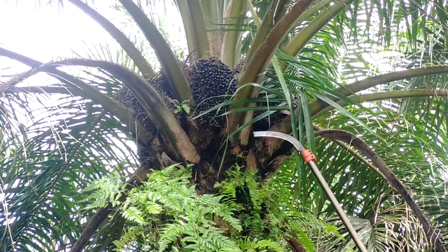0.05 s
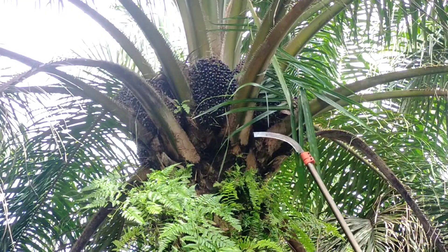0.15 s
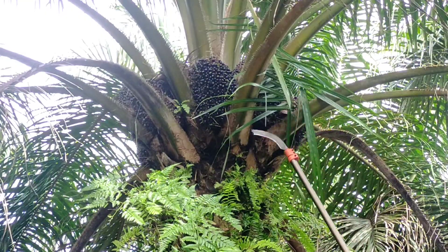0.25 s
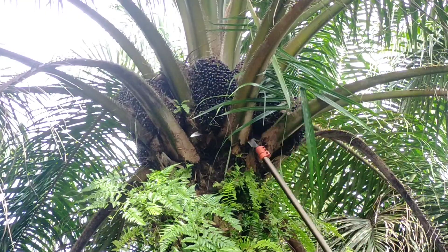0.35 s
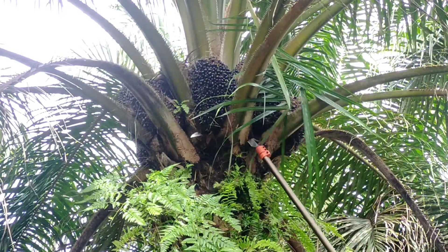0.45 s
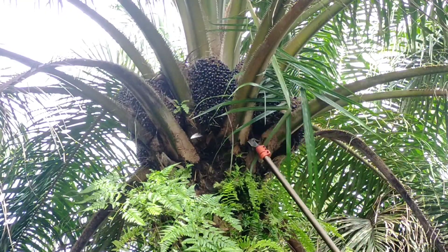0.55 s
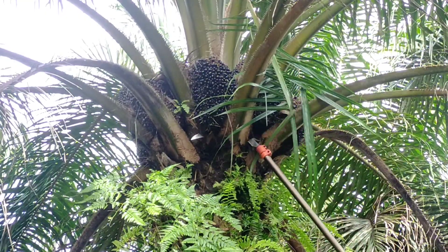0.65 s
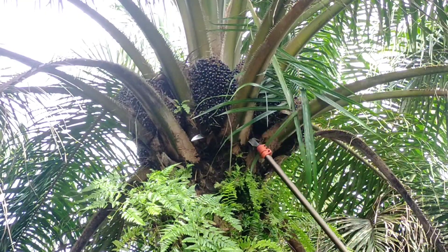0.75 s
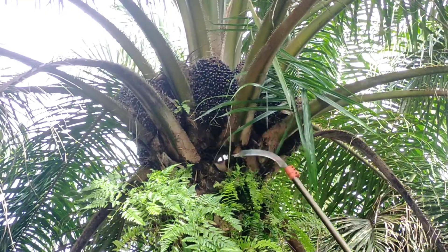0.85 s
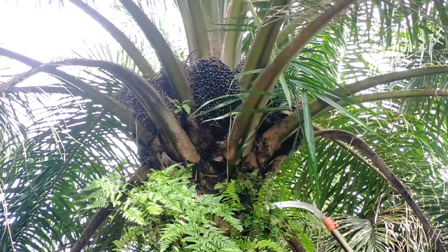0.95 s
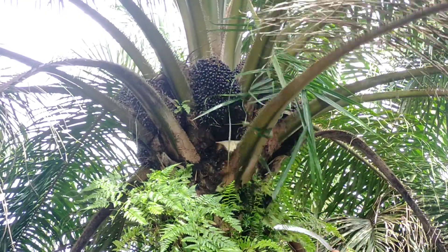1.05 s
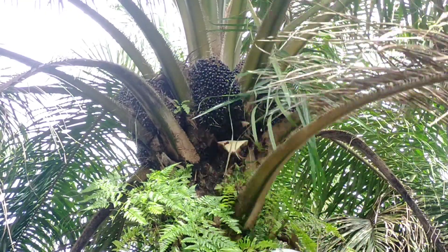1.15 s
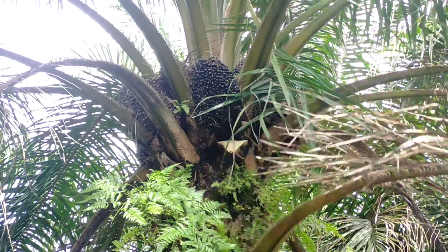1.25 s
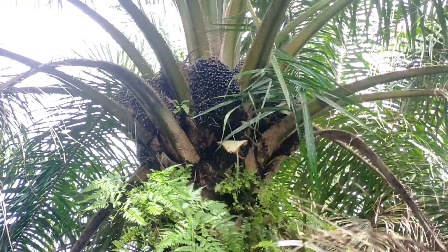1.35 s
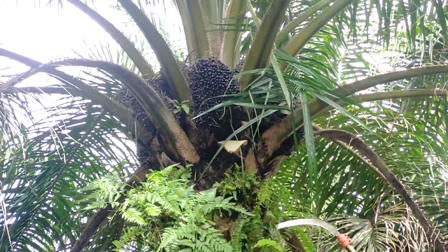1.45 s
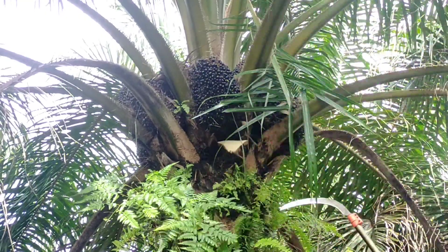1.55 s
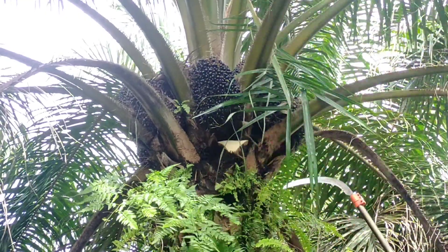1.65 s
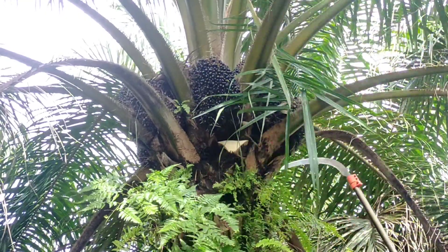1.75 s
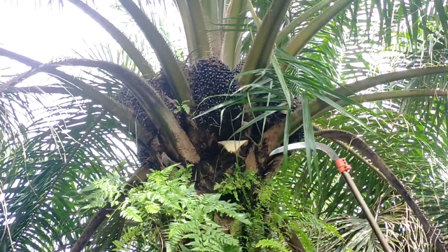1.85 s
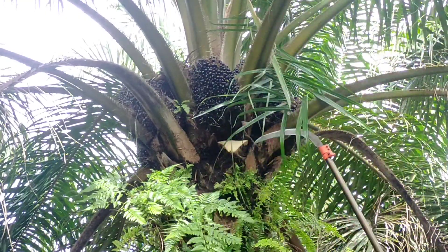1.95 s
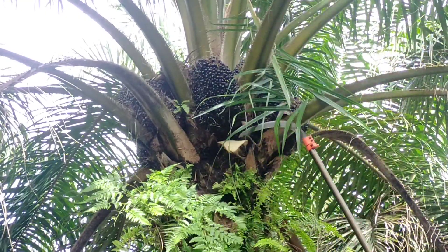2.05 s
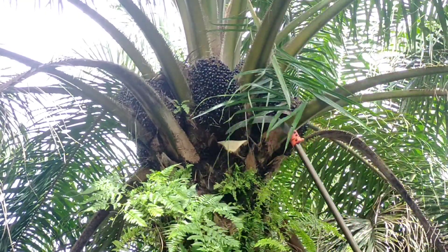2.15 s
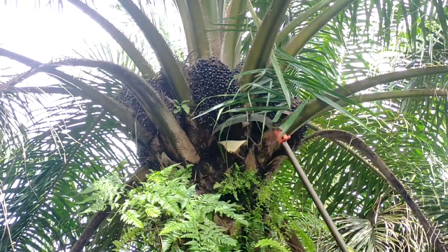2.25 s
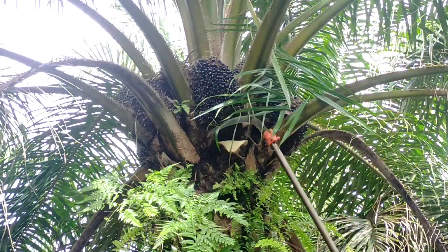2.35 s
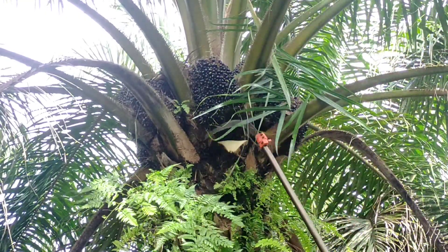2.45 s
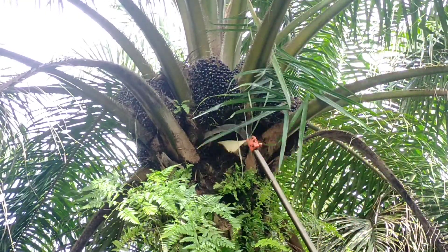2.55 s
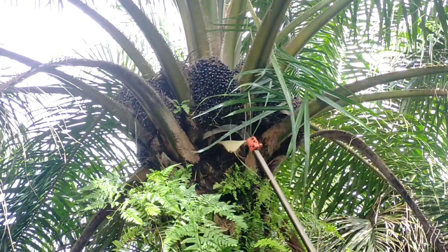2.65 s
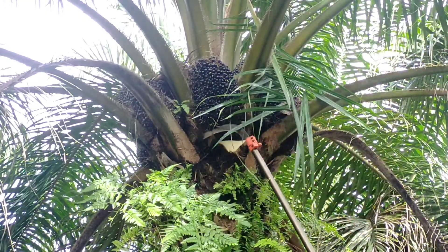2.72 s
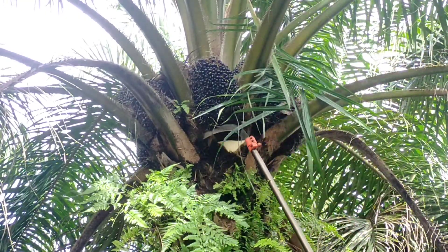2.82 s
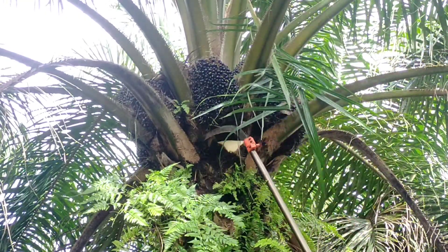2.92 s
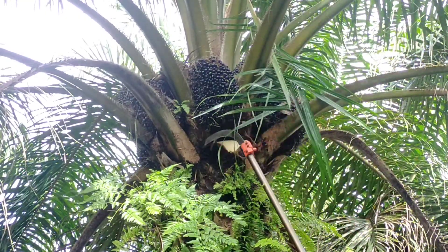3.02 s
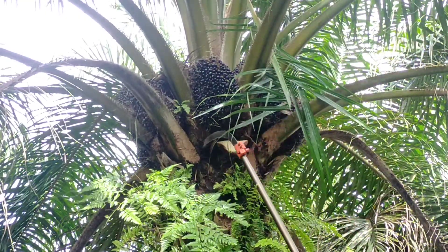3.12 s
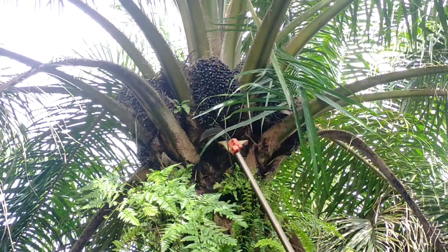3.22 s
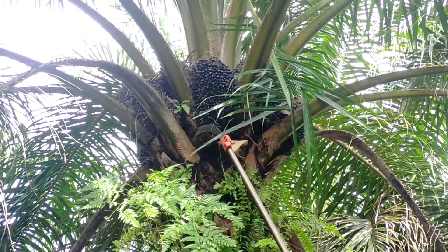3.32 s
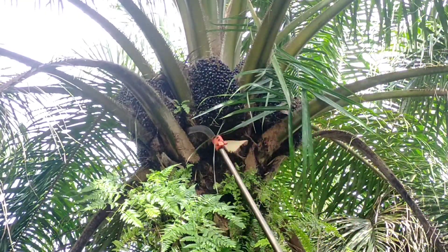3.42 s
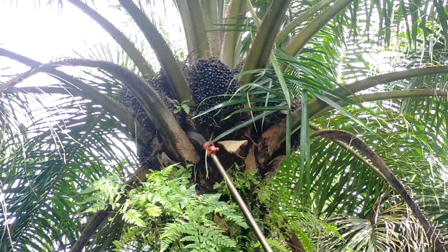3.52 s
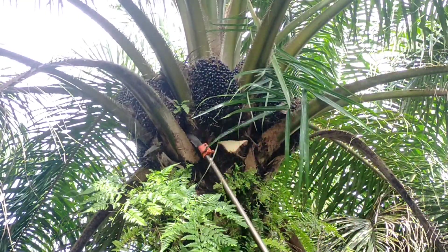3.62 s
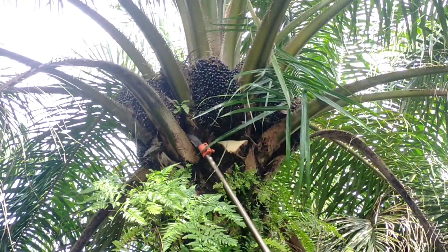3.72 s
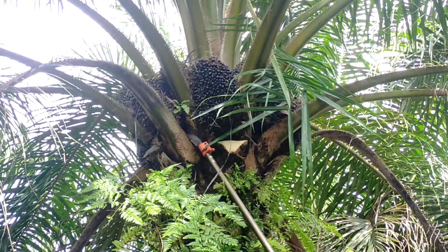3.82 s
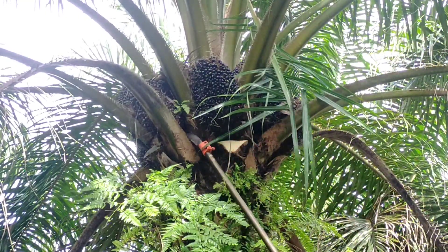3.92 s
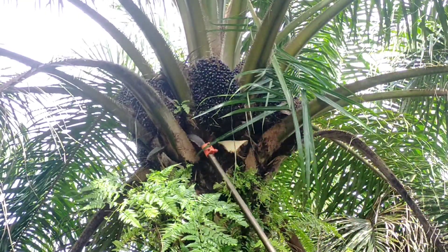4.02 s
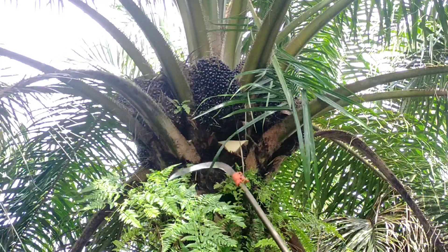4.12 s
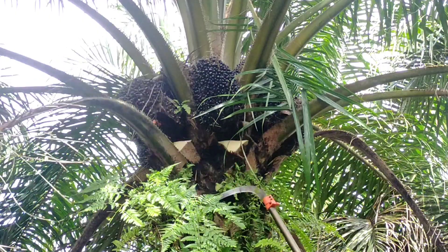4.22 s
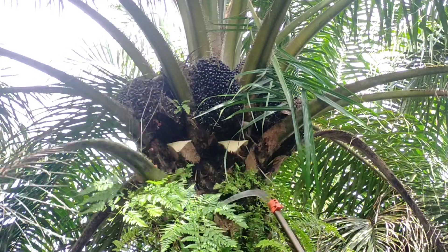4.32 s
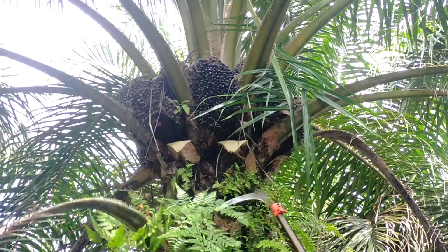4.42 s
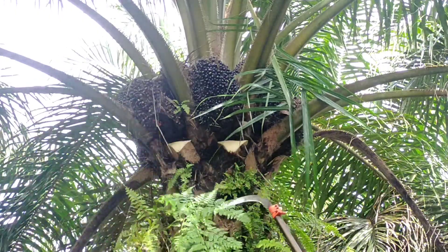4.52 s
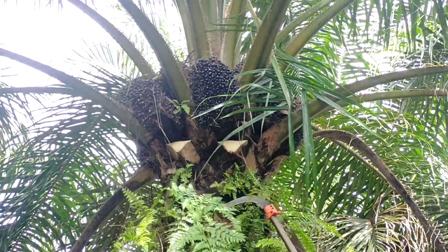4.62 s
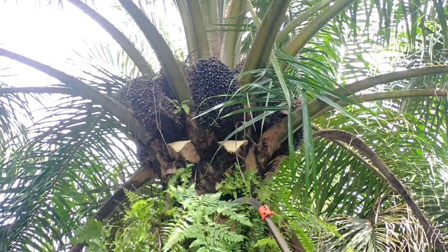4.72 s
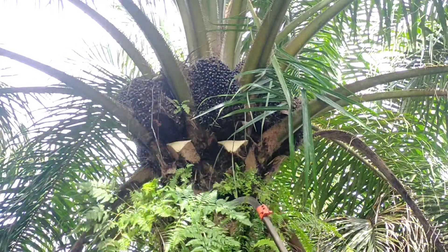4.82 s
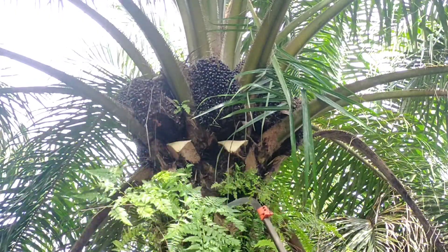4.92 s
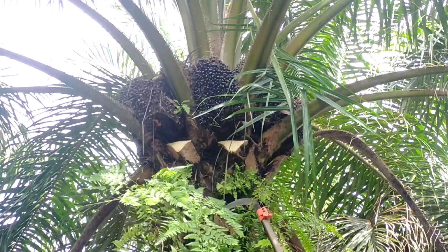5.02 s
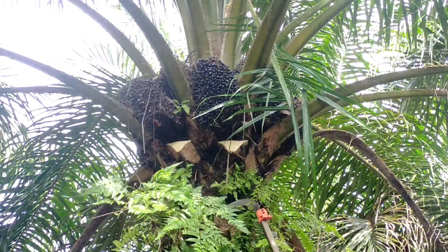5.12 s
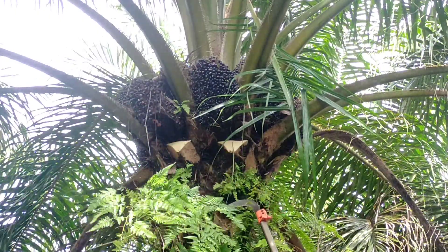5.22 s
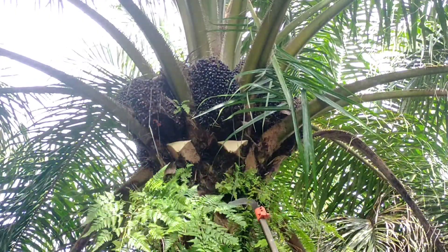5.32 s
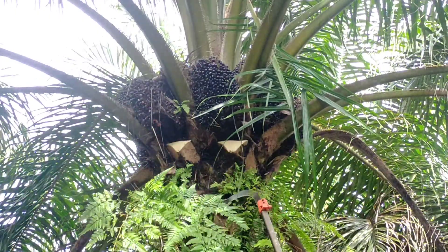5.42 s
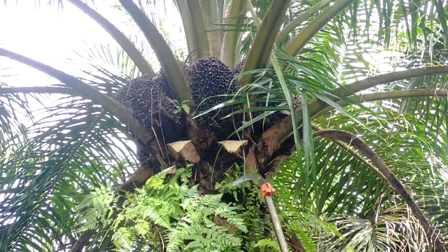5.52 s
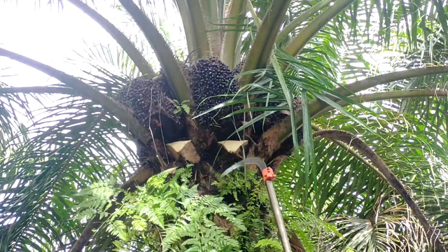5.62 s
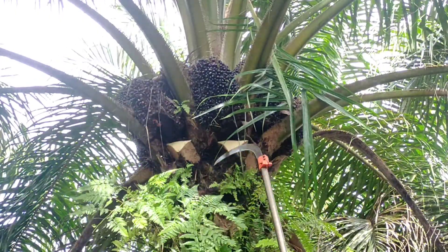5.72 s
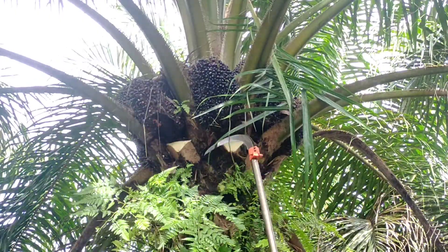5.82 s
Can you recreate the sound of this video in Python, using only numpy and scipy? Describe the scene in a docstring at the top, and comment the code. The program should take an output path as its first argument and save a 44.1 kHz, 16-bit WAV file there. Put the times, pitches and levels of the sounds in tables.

```python
"""Cutting oil palm fronds

A sickle on a long pole cuts two fronds: its blade rasps through the stalk in filtered clicks and rings
as wavering sines, while noise bursts through resonances make the fibres snap and crack.
Swelling crackle sweeps each frond down through the leaves; the second lands with several thumps.
Insect bands of noise and a far bird's gliding sines lie behind; loud peaks overload a mono microphone."""
import sys
import numpy as np
from scipy import signal
from scipy.fft import rfft, irfft
from scipy.io import wavfile
from scipy.ndimage import uniform_filter1d

SR = 44100
rng = np.random.default_rng(int(sys.argv[2]) if len(sys.argv) > 2 else 0)


def digitize_waveform(pressure):
    """Quantize a signal to 16-bit integers and store it at the path in sys.argv[1].

    Rows of a 2-D input are taken as channels; values are limited to [-1, 1].
    """
    field = np.atleast_2d(pressure).T
    bounded = np.clip(field, -1, 1)
    quanta = np.round(bounded * 32767).astype(np.int16)
    wavfile.write(sys.argv[1], SR, quanta)


N = 258848  # samples
TIME = np.arange(N) / SR  # s


def amp(db):
    """Decibels to gain."""
    return 10 ** (np.asarray(db) / 20)


def unit(x):
    """Scales to an rms of 1."""
    return x / np.sqrt(np.mean(x ** 2) + 1e-20)


def add(mix, s, sound):
    """Mixes a sound in at s seconds."""
    part = mix[max(round(s * SR), 0):][:len(sound)]
    part += sound[:len(part)]


def colour(x, points):
    """Filters by a spectrum drawn on a log-frequency axis, then scales to an rms of 1."""
    hz, db = np.transpose(points)
    f = np.fft.rfftfreq(len(x), 1 / SR)
    gain = amp(np.interp(np.log(f + 1), np.log(hz), db))
    return unit(irfft(rfft(x) * gain, len(x)))


def drift(rate_hz):
    """Smooth chance of rms 1: noise whose spectrum falls off as a Gaussian around rate_hz."""
    f = np.fft.rfftfreq(N, 1 / SR)
    slow = rfft(rng.standard_normal(N)) * np.exp(-(f / rate_hz) ** 2)
    return unit(irfft(slow, N))


def crackle(per_s, spread_db, clump_db, clump_hz, wash):
    """Tiny fractures of uneven size that come in clumps, over a wash of countless smaller ones."""
    size = amp(spread_db * np.minimum(rng.exponential(1, N), 4))
    clicks = size * rng.choice([-1, 1], N) * (rng.random(N) < per_s / SR)
    bed = unit(clicks) + wash * rng.standard_normal(N)
    return unit(bed * amp(clump_db * drift(clump_hz)))


def swell(s, rise_s, hold_s, t60):
    """A gain that rises smoothly from s, holds, and dies away by 60 dB in t60."""
    t = TIME - s
    attack = np.sin(np.pi / 2 * np.clip(t / rise_s, 0, 1)) ** 2
    return attack * np.exp(-np.log(1000) * np.maximum(t - rise_s - hold_s, 0) / t60)


def together(levels_db, swells):
    """Overlapping swells add up in power."""
    return np.sqrt(sum((amp(db) * shape) ** 2 for db, shape in zip(levels_db, swells)))


def grove(x, wet_db, t60):
    """Trunks and leaves scatter a short, thin echo: sparse random taps that die away."""
    t = np.arange(SR // 2) / SR
    taps = rng.standard_normal(len(t)) * (rng.random(len(t)) < 2500 / SR) * (t > .004)
    taps *= amp(-60 * t / t60)
    return x + amp(wet_db) * signal.fftconvolve(x, taps / np.linalg.norm(taps))[:N]


def hollow(x):
    """Whatever breaks in the stalk also sounds its hollow resonances; the overall level is kept."""
    # hollow resonances of the frond stalk: f/Hz, width/Hz, level/dB over the direct sound
    resonances = [(387, 37, 1.5), (788, 50, -7), (997.2, 22.9, 3.5), (1280, 33, -3), (1633, 22.3, -10),
                  (2070, 110, -2), (2377, 107, -7)]
    rings = np.zeros(len(x))
    for hz, width, db in resonances:
        rings += amp(db) * signal.lfilter(*signal.iirpeak(hz, hz / width, SR), x)
    return (x + rings) * np.std(x) / np.std(x + rings)


def fracture(t, t60, rise_s, grain_db):
    """A dying cluster of tiny breaks, and the rms of its envelope against the peak."""
    shape = amp(-60 * t / t60) * (1 - np.exp(-t / rise_s))
    grain = amp(grain_db * unit(uniform_filter1d(rng.standard_normal(len(t)), size=30)))
    burst = rng.standard_normal(len(t)) * shape * grain
    return burst, np.sqrt(np.mean(shape ** 2)) / shape.max()


def blows(rows, partials, q, skirt, rise_s, grain_db):
    """Each blow is a cluster of breaks that rings the resonances of the struck part."""
    out = np.zeros(N)
    for s, db, hz, t60 in rows:
        t60 = np.clip(t60, .004, .3)
        t = np.arange(int((t60 + .02) * SR)) / SR
        burst, size = fracture(t, t60, rise_s, grain_db)
        body = np.zeros(len(burst))
        for k, (ratio, partial_db) in enumerate(partials):
            centre = min(hz * ratio, SR / 3)
            peak = signal.iirpeak(centre, max(q, centre / 4000), SR)
            # neighbouring resonances have opposite signs
            body += (-1) ** k * amp(partial_db) * unit(signal.lfilter(*peak, burst))
        blow = unit(unit(body) + skirt * unit(burst))  # the skirt is the unfiltered burst
        add(out, s, amp(db) * size * blow / 2)
    return out


def strays(peak_db, low_hz, high_hz):
    """Rows of small chance blows as the pole brushes through the crown on its way to the next frond."""
    # the span of the move: start t/s, end t/s
    start, end = (2.4, 4.0)
    per_s, spread_db, t60_s = 5, 4, .015
    span = end - start
    rows = []
    for when, size, pitch in rng.random((int(per_s * span), 3)):
        db = peak_db + spread_db * (2 * size - 1)
        hz = low_hz * (high_hz / low_hz) ** pitch
        rows.append((start + span * when, db, hz, t60_s))
    return rows


def plantation():
    """Steady air, faintly ticking leaves, and insect choruses as bands of noise with flickering level."""
    # spectrum of the open air: f/Hz, relative level/dB per Hz
    air = [(25, 1), (120, -11.5), (260, -9), (500, -9), (900, -5), (2170, -3), (3300, -5), (4300, -10),
           (6500, -12), (8810, -13.5), (11500, -13.5), (13200, -12), (14300, 2.5), (15400, 3)]
    # insect choruses: f/Hz, width/Hz, level/dB
    insects = [(5575, 980, -46.5), (7584, 880, -39.5), (10200, 160, -61.5)]
    air_db, rustle_db = -35.5, -36.5
    f = np.fft.rfftfreq(N, 1 / SR)
    out = amp(air_db) * colour(rng.standard_normal(N), air)
    ticking = crackle(per_s=350, spread_db=3.5, clump_db=1.5, clump_hz=25, wash=.7)
    out += amp(rustle_db) * colour(ticking, air)
    for hz, width, db in insects:
        skirts = (1 + (2 * (f - hz) / width) ** 4) ** 0.67
        band = irfft(rfft(rng.standard_normal(N)) / skirts, N)
        out += unit(band) * amp(db + 1.42 * drift(40))
    return out


def bird():
    """Thin, unsteady whistles from far off, each one arch of level and pitch, smeared by the trees."""
    # whistles: t/s, length/s, f/Hz, glide/Hz, arch/Hz, relative level/dB
    whistles = [(3.253, 0.19, 3070, 40.5, 42.5, -43.5), (3.619, .12, 3270, 170.5, 128.5, -39.5),
                (3.763, 0.21, 2765, -72, -14, -44.5), (4.035, .1, 2533, 116, -25, -39.5)]
    out = np.zeros(N)
    for s, length, hz, glide_hz, arch_hz, db in whistles:
        along = np.clip((TIME - s) / length, 0, 1)
        arch = np.sin(np.pi * along)
        pitch = hz + glide_hz * (along - .5) + arch_hz * arch
        turns = np.cumsum(pitch * (1 + 0.00543 * drift(184))) / SR
        out += np.sqrt(2) * np.sin(2 * np.pi * turns) * amp(db) * np.abs(arch) ** 0.76
    return grove(out * amp(2 * drift(50)), wet_db=-9, t60=.3)


def foliage():
    """Leaflets flick past each other as the frond drags through crown and ferns; a few tick sharply."""
    # the frond drags through leaves: t/s, relative fizz of leaflets level/dB,
    # relative swish of whole leaves level/dB, rise/s, hold/s, t60/s
    drags = [(0.133, -30, -34.5, 0.063, 0.049, 0.82), (1.243, -25.5, -35, 0.15, .15, .5),
             (1.498, -13, -30, 0.0618, 0.0095, 0.596), (1.596, -12, -27, 0.073, 0.0754, 0.47),
             (1.8, -13, -25.5, .06, .09, 0.7), (1.971, -14, -25, 0.0414, 0.046, 0.69),
             (2.191, -25.5, -39, 0.055, 0.041, 1.5), (2.428, -42, -36.5, 0.033, .02, 1.2),
             (2.63, -28, -34, 0.03, 0.058, .7), (2.942, -43.5, -50.5, 0.035, 0.145, 0.51),
             (3.27, -38.5, -50, 0.032, 0.0255, 0.74), (4.444, -13, -20, 0.19, 0.113, 1.2),
             (4.91, -17.5, -22.5, 0.042, 0.0183, 0.69), (5.015, -14.5, -17.5, 0.029, 0.0805, 0.47),
             (5.082, -10, -22, 0.043, .012, 0.48), (5.221, -24, -31.5, 0.065, 0.1113, 0.69),
             (5.503, -32, -38, 0.049, 0.0864, 1.01), (5.751, -35.5, -41, 0.057, 0.035, .5)]
    # spectrum of the leaflets: f/Hz, relative level/dB per Hz
    fizz_spectrum = [(200, -45), (1500, -13), (3500, -10.5), (6200, -12), (7700, -1.5), (9200, -13),
                     (11000, -7), (13000, -1), (14500, 5.5), (15500, -4.5)]
    # spectrum of the whole leaves: f/Hz, relative level/dB per Hz
    swish_spectrum = [(30, -33), (120, -18), (300, -10.5), (600, -6), (1000, 0), (2400, 2), (3500, -2.5),
                      (5500, -8.5), (12000, -10)]
    flicks = crackle(per_s=3300, spread_db=1.0, clump_db=1.25, clump_hz=139, wash=0.71)
    ticks = crackle(per_s=130, spread_db=3, clump_db=1.5, clump_hz=30, wash=0)
    t = np.arange(SR // 250) / SR
    tick_noise = rng.standard_normal(len(t)) * np.exp(-t / .0005)
    ticks = unit(signal.fftconvolve(ticks, tick_noise)[:N])
    fizz = colour(flicks + .45 * ticks, fizz_spectrum)
    leaves = crackle(per_s=900, spread_db=2.8, clump_db=2, clump_hz=60, wash=0.65)
    swish = colour(leaves, swish_spectrum)
    sweeps = [swell(s, rise_s, hold_s, t60) for s, _, _, rise_s, hold_s, t60 in drags]
    _, fizz_db, swish_db, *_ = np.transpose(drags)
    fizz_part = amp(1.5) * fizz * together(fizz_db, sweeps)
    return fizz_part + amp(2.5) * swish * together(swish_db, sweeps)


def impacts():
    """Noise bursts ring as bright snaps, woody cracks and knocks, dull thumps and deep shudders."""
    # All blows: t/s, relative level/dB, f/Hz, t60/s (blows() limits f and t60).
    # sharp snaps of fibre and leaflet
    snap_rows = [(0.211, -20, 12500, .01), (0.2165, -15, 8000, 0.0073), (0.2255, -4, 14000, 0.0042),
                 (0.2505, 10.5, 15200, 0.0067), (0.437, -4, 7050, 0.058), (0.468, 3, 6350, 0.15),
                 (0.543, -3.5, 11770, .05), (0.635, -8.5, 7160, 0.076), (0.8815, -10, 7200, 0.054),
                 (0.893, 1, 8300, 0.02), (0.925, 3.5, 14700, 0.31), (1.0555, 2.5, 8100, 0.026),
                 (1.2225, -3, 7230, .035), (1.309, -1, 9100, 0.025), (1.486, -9, 8350, 0.0069),
                 (1.555, 2, 14100, .08), (1.679, -2.5, 13100, 0.035), (2.2574, -15, 12000, 0.026),
                 (2.326, -12.5, 12900, 0.016), (2.878, -15.5, 13100, 0.012), (3.027, -17.5, 14000, .015),
                 (3.433, -24, 3740, 0.027), (3.7405, -22.5, 14000, 0.029), (4.156, 8, 15000, 0.1),
                 (4.271, -2, 8550, 0.028), (4.313, -14.5, 4470, 0.045), (4.405, 1, 7750, 0.091),
                 (4.918, 0, 14700, 0.059), (5.038, 3, 13900, 0.056), (5.262, -2.5, 14250, .025),
                 (5.545, -15, 14000, .015), (5.7439, -11.5, 3140, 0.0126), (5.8235, -9.5, 14300, 0.019)]
    # woody cracks of the stalk and knocks of the pole
    crack_rows = [(0.0612, -18, 1450, 0.063), (0.125, -20, 1390, 0.087), (0.2502, -25.5, 900, 0.013),
                  (0.378, -26.5, 684, 0.26), (0.392, -19.5, 1980, 0.217), (0.4375, -12, 1310, 0.073),
                  (0.717, -21, 1440, 0.35), (0.861, -12, 1790, 0.039), (0.909, -6.5, 1530, 0.097),
                  (0.922, 6, 1753, 0.09), (0.966, -8, 1513, 0.031), (1.034, -7.5, 2840, 0.09),
                  (1.055, -8, 2900, 0.023), (1.177, -15, 1820, 0.033), (1.424, -20.5, 965, 0.073),
                  (1.814, -12.5, 1420, 0.0285), (1.837, -6.5, 2000, 0.096), (2.478, -19.5, 1490, 0.19),
                  (2.584, -23, 1840, .02), (2.634, -21.5, 2860, 0.039), (2.822, -22, 1560, 0.082),
                  (2.897, -22, 1780, .02), (2.932, -25, 1314, 0.036), (3.04, -25, 2270, 0.071),
                  (3.333, -22.5, 1056, 0.024), (3.45, -31, 1500, .11), (3.661, -19, 1960, 0.063),
                  (3.741, -12, 1580, 0.086), (3.87, -24, 1330, 0.089), (3.94, -30.5, 1230, .05),
                  (4.0942, -6.5, 1600, 0.0129), (4.129, -5.5, 1603, 0.125), (4.19, -1, 1223, 0.038),
                  (4.3127, -2, 1900, 0.0424), (4.506, -14, 1694, 0.047), (4.547, -12.5, 1100, 0.039),
                  (5.744, -18, 1687, 0.0255), (5.77, -21.5, 1670, .03)]
    # the heavy frond lands and bounces
    thump_rows = [(4.9175, 0.5, 746, 0.031), (4.931, -8.5, 520.5, 0.026), (5.037, 1.5, 660, 0.065),
                  (5.049, -2.5, 905, 0.025), (5.0725, 2.5, 1056, 0.0216), (5.123, 4.5, 839, 0.02),
                  (5.156, 2.5, 804, 0.0202), (5.198, -5, 570, 0.028), (5.261, -13.5, 900, 0.017),
                  (5.8245, -17, 1037, 0.013)]
    # deep shudders under the cuts, the falls and the landing
    shudder_rows = [(0.44, -23, 400, 0.1), (0.455, -21.5, 179.4, 0.081), (0.915, -13.5, 188, 0.15),
                    (0.925, -14.5, 402, 0.156), (1.235, -23.5, 374.4, 0.24), (1.55, -27.5, 133, 0.069),
                    (1.845, -25, 64.5, 0.25), (2.65, -29, 172, 0.082), (4.13, -16, 367, 0.29),
                    (4.918, -24, 190, 0.057), (5.038, -13, 200.7, 0.065), (5.07, -26.5, 70, 0.196)]
    # wood bumps on wood with one hollow note
    knock_rows = [(3.227, -31, 553, .03), (5.203, -15, 464, 0.0396), (5.261, -15, 616, 0.033),
                  (5.282, -9.5, 736, 0.019), (5.8245, -23.5, 740, 0.013)]
    # resonances of a struck part: ratio to its centre, relative level/dB
    struck = [(0.578, -4), (.84, 6), (1.15, 7), (1.62, 3)]
    # resonances of the landing stalk: ratio to its centre, relative level/dB
    stalk = [(.4, -16), (.64, 0), (1, 1), (1.5, 2.5), (2.3, -0.5), (3.2, 2)]
    single = [(1, 0)]  # one resonance, at the centre itself
    snap_rows = snap_rows + strays(-25, low_hz=4100, high_hz=14000)
    crack_rows = crack_rows + strays(-34, low_hz=700, high_hz=2000)
    snaps = blows(snap_rows, single, q=4.8, skirt=0.191, rise_s=0.00018, grain_db=9.0)
    cracks = blows(crack_rows, struck, q=1.8, skirt=0.612, rise_s=0.00043, grain_db=-0.5)
    thumps = blows(thump_rows, stalk, q=8, skirt=.18, rise_s=.0007, grain_db=2)
    shudders = blows(shudder_rows, single, q=4, skirt=0, rise_s=.005, grain_db=2)
    knocks = blows(knock_rows, single, q=5.4, skirt=.05, rise_s=0.00086, grain_db=1)
    wood = hollow(amp(0.5) * cracks) + knocks + amp(-1.0) * thumps + amp(-4) * shudders
    dull = signal.butter(2, 4200, fs=SR, output="sos")
    return amp(-2.0) * snaps + signal.sosfilt(dull, wood)


def blade():
    """The steel rings afresh at each catch as a set of sines; rubbing on the stalk makes each mode waver."""
    # the blade catches: t/s, relative level/dB, lowest mode f/Hz, t60/s, lift of the upper modes/dB
    catches = [(0.285, -38, 3233, 0.27, 14), (0.437, -31, 3218, 0.32, 18.5), (0.468, -15.5, 3240, 0.9, 9.5),
               (0.519, -15.5, 3264, .36, 6.5), (0.578, -18, 3260, .18, -8), (0.894, -31, 3220, .15, 25.5),
               (0.978, -12, 3240, 0.11, 5), (1.056, -18.5, 3244, 0.23, 0), (1.1025, -5, 3230, 0.12, -9),
               (1.125, -18, 3240, .4, 7), (1.19, -18.5, 3232, 0.342, 8), (1.266, -20.5, 3240, 0.38, 4),
               (1.39, -31, 3220, .25, 6.5), (2.69, -40, 3280, 0.57, 0), (3.742, -31, 3320, 0.234, -7),
               (4.261, -24, 3350, 0.17, 8), (4.32, -18.5, 3350, 0.21, 3), (4.405, -22, 3500, 0.068, 9)]
    # modes of the blade: ratio to the lowest, relative level/dB
    modes = [(1, 2.5), (1.014, -8), (1.849, -36), (2.388, -50), (2.818, -18), (2.867, -12.5)]
    gain, lift = np.zeros(N), np.ones(N)
    pitch = np.full(N, 1. * catches[0][2])
    for s, db, hz, t60, lift_db in catches:
        after = TIME >= s  # each catch replaces the ring before it
        gain[after] = amp(db - 60 * (TIME[after] - s) / t60)
        pitch[after], lift[after] = hz, amp(lift_db)
    ring = np.zeros(N)
    for ratio, db in modes:
        turns = np.cumsum(ratio * pitch * (1 + 0.006042 * drift(158))) / SR
        upper = ratio > 1.5
        level = uniform_filter1d(gain * lift ** upper, size=130)  # about 3 ms, softens the onsets
        ring += amp(db + 2 * drift(110)) * np.sin(2 * np.pi * turns) * level
    return amp(2.5) * ring


def cutting():
    """At each bite the edge rasps across the stalk while the fibres behind it tear, both as crackle."""
    # the blade lurches through the stalk: t/s, relative rasp of the edge level/dB,
    # relative crunch of tearing fibre level/dB, hold/s, t60/s
    lurches = [(0.274, -25, -32.5, .008, 0.29), (0.428, -18.5, -16.5, 0.0257, 0.15),
               (0.462, -8.5, -20.5, .01, 0.154), (0.498, -17, -31.5, 0.062, 0.36),
               (0.594, -29, -32, 0.078, 0.19), (0.893, -12, -19.5, 0.02, 0.47),
               (0.948, -13.5, -10.5, .012, 0.32), (1.014, -16.5, -21, 0.0923, 0.43),
               (1.195, -18.5, -25.5, 0.028, 0.205), (1.224, -25.5, -20.5, 0.028, 0.16),
               (1.26, -22, -39, 0.031, 0.383), (1.403, -45, -31.5, 0.056, 0.18),
               (3.57, -60, -37, 0.135, 0.27), (3.697, -28.5, -46, 0.018, 0.53),
               (3.734, -21, -31, 0.011, 0.23), (4.107, -24, -19.5, 0.011, .2),
               (4.124, -13, -12.5, 0.0383, 0.38), (4.183, -19, -9.5, 0.0091, 0.141),
               (4.255, -16.5, -22.5, .008, .27), (4.306, -17, -20.5, 0.0073, 0.38),
               (4.393, -16.5, -23.5, 0.0084, 0.27), (4.441, -27, -25.5, .012, .15)]
    # spectrum of the edge: f/Hz, relative level/dB per Hz
    rasp_spectrum = [(300, -27), (1500, -16), (3200, 7), (4500, 3), (6400, 1.5), (7800, 7), (8500, -2),
                     (9200, 1), (10200, -16), (12500, 1), (15000, 4)]
    # spectrum of the tearing fibre: f/Hz, relative level/dB per Hz
    crunch_spectrum = [(30, -24), (120, -21), (300, -20), (600, -2.5), (1000, 3.5), (2200, 5), (3200, -1.5),
                       (5000, -15.5), (10000, -5), (15000, -9)]
    rise_s = 0.0064
    edge = crackle(per_s=2200, spread_db=1.0, clump_db=2, clump_hz=150, wash=0.8)
    fibres = crackle(per_s=800, spread_db=3.5, clump_db=2.2, clump_hz=130, wash=.35)
    rasp = colour(edge, rasp_spectrum)
    crunch = hollow(colour(fibres, crunch_spectrum))
    bites = [swell(s, rise_s, hold_s, t60) for s, _, _, hold_s, t60 in lurches]
    _, rasp_db, crunch_db, _, _ = np.transpose(lurches)
    rasp_part = amp(3.0) * rasp * together(rasp_db, bites)
    return rasp_part + amp(1.5) * crunch * together(crunch_db, bites)


def scene():
    """All sources reach one microphone, heard alike on both channels."""
    work = grove(cutting() + foliage() + impacts(), wet_db=-13, t60=0.27)
    mono = work + blade() + bird() + plantation()
    return np.array([mono, mono])


def record(dry):
    """The peaks overload at full scale, then a low-pass limits the band."""
    edge_hz = 15550
    clipped = np.clip(dry, -1, 1)
    lowpass = signal.firwin(401, edge_hz, window=("kaiser", 8), fs=SR)
    return signal.oaconvolve(clipped, lowpass[None], "same")


dry = scene()
out = record(dry)
digitize_waveform(out)
```